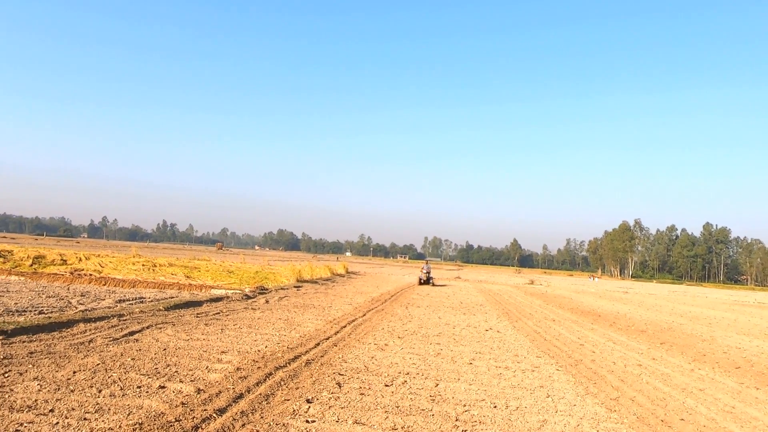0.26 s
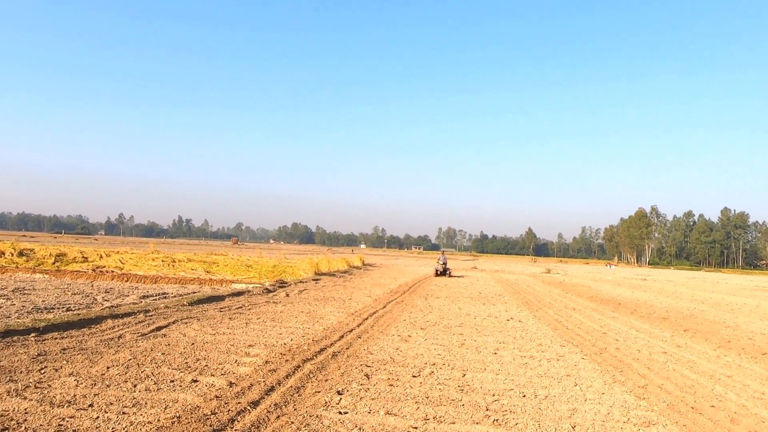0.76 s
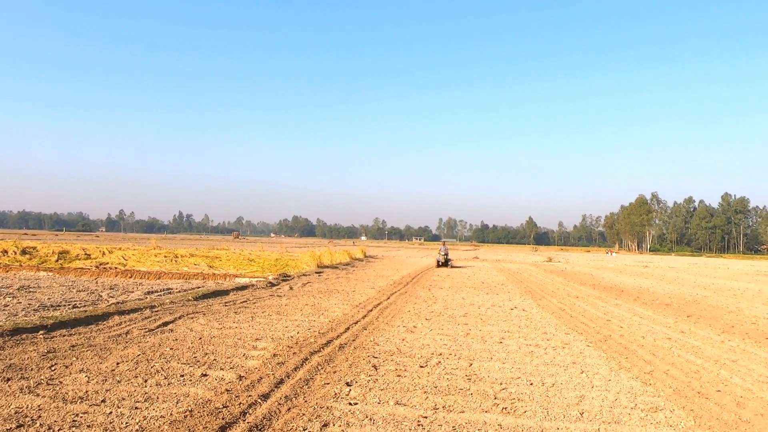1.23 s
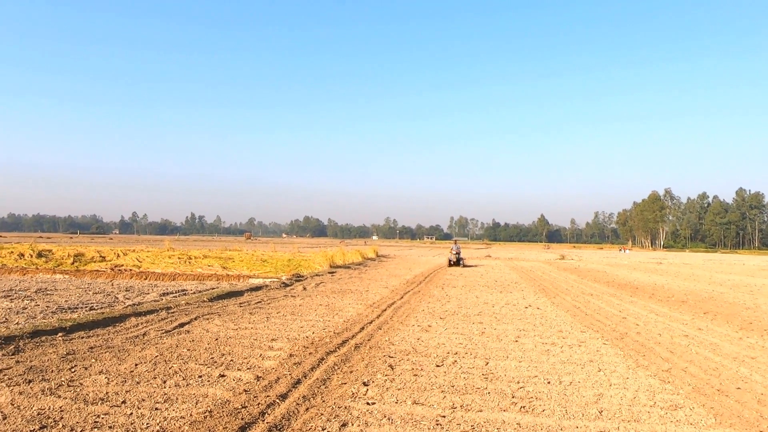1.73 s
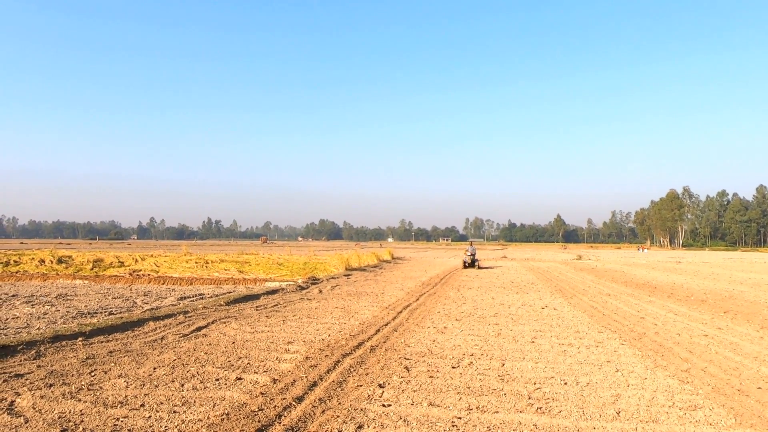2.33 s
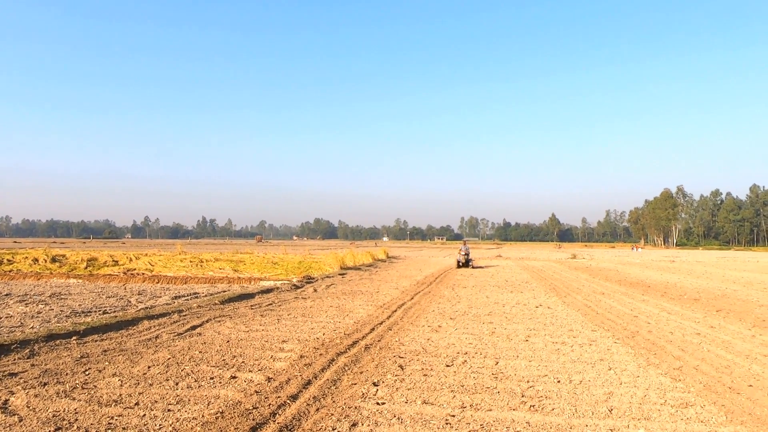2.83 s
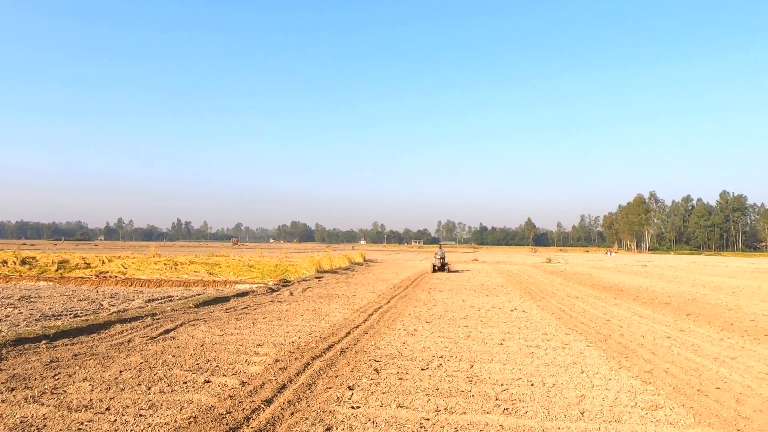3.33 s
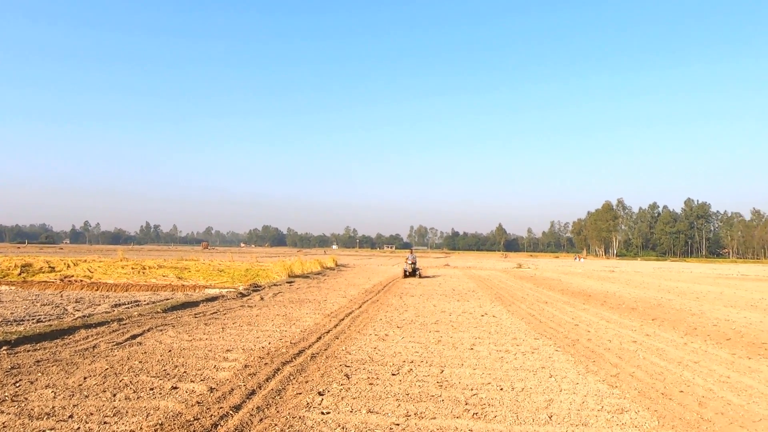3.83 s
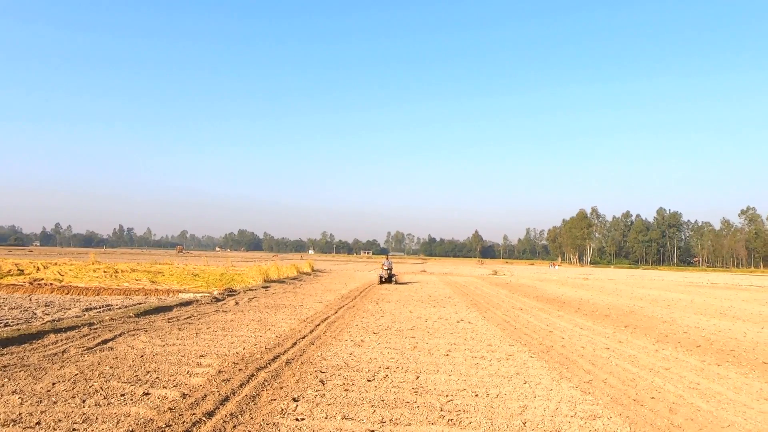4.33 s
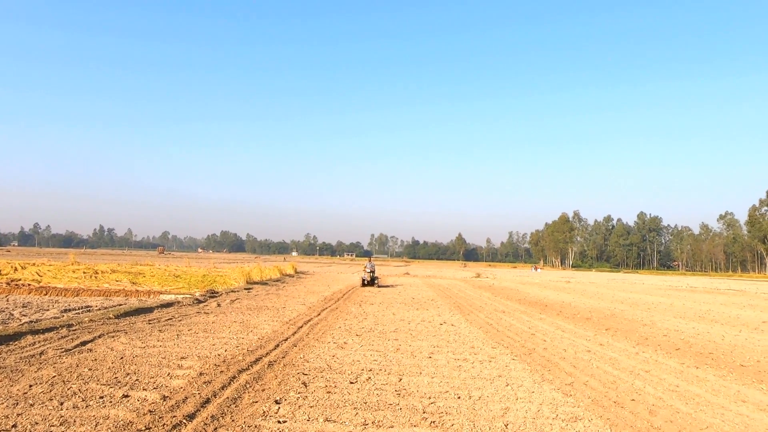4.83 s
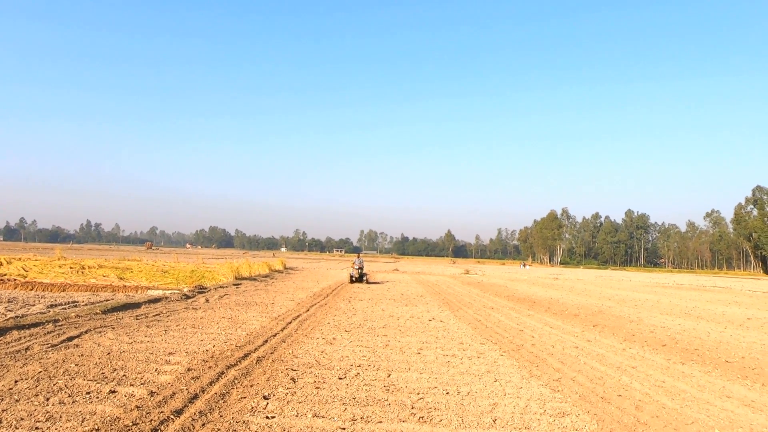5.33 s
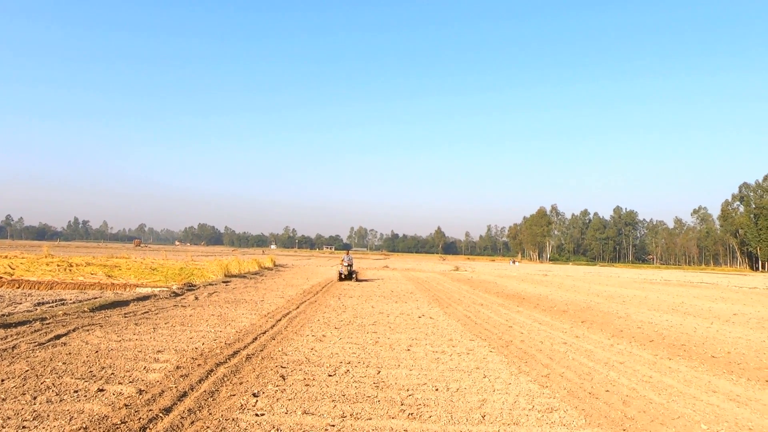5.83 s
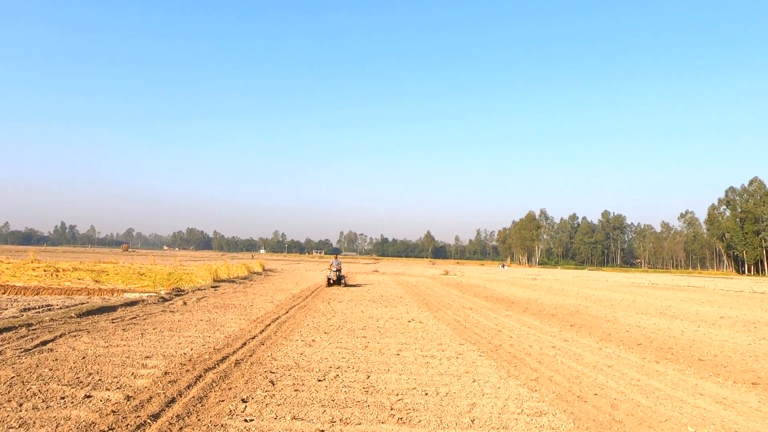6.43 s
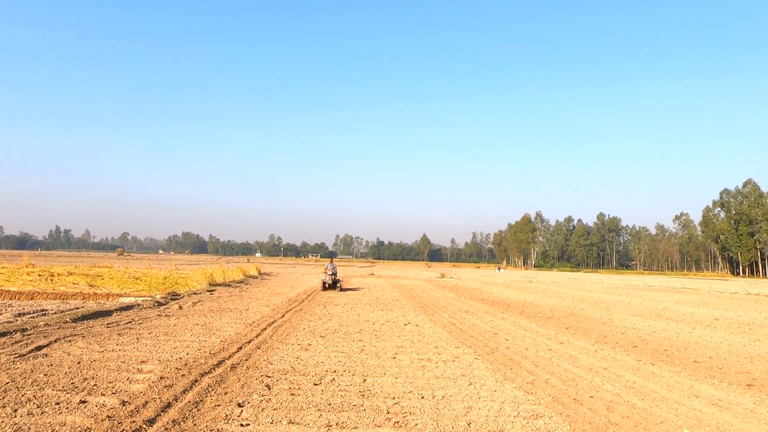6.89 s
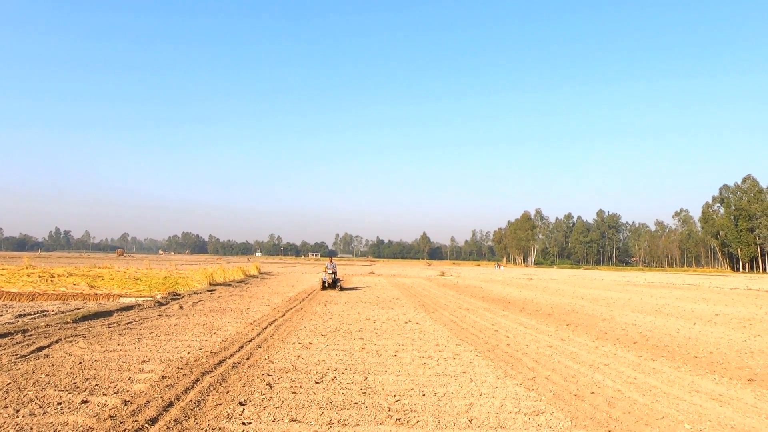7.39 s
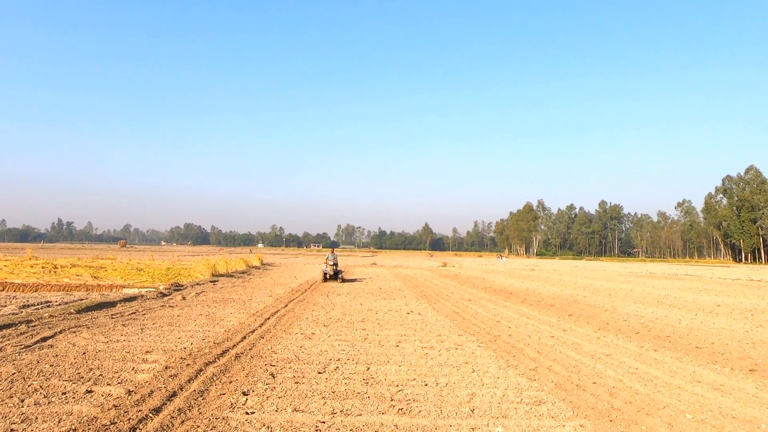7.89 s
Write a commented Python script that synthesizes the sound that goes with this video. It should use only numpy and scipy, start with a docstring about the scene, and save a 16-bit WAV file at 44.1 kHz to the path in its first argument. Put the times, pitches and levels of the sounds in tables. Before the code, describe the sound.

From 0 to 8 seconds a small single-cylinder diesel tiller runs continuously on an open, bare field, starting about thirty metres off and creeping nearer. It fires roughly fifteen times a second at nearly constant speed: a short, hard metallic knock around 2 to 2.6 kHz, then a low exhaust thud and puff near 90 Hz. Steady low rumble and thin bright rattling of tappets, chain and tines fill the gaps. Knocks briefly soften, notably near 0.8, 1.0, 1.5, 2.4 and 4.8 seconds, and are strongest around 3.5-5.2 and 6.9. Crankcase clonks thicken from 3 seconds, fullest after 6.8; dull soil crunching remains faint. Slight rubbing chirps slide upward at 4.1 and downward near 7.6. From 3.5 to 5 the stereo microphone turns aside, changing the right side's tone. Soft low wind buffets, stronger left, come near 6 and 6.5.

```python
"""Single-cylinder diesel tiller driving slowly closer over a bare field: each firing rings the head
in a sharp knock, then the exhaust valve rings the silencer and a low puff follows.
Filtered noise adds a steady low engine rumble and the soil churning; shaped impact grains make
crankcase, gear and tine clatter. Ground bounce, holder echo and port filters colour the tiller.
Behind it: gusty breeze as separate noise at two microphone ports."""
import sys
import numpy as np
from scipy import signal
from scipy.fft import rfft, irfft
from scipy.io import wavfile

SR = 44100
rng = np.random.default_rng(int(sys.argv[2]) if len(sys.argv) > 2 else 0)


def bounce(signal):
    """Save signal as a 16-bit WAV file at the path given by the first command-line argument."""
    frames = np.transpose(np.atleast_2d(signal))
    limited = np.clip(frames, -1, 1)
    pcm = np.round(limited * 32767).astype(np.int16)
    wavfile.write(sys.argv[1], SR, pcm)


N = 359415

# Source levels are dB ahead of the filters and paths that follow.
# engine speed: (time [s], firing rate [1/s])
SPEED_HZ = [(0.0, 14.573), (0.6, 14.548), (1.1, 14.529), (1.7, 14.568), (2.2, 14.595), (2.8, 14.597),
            (3.3, 14.56), (3.9, 14.557), (4.5, 14.511), (5.1, 14.525), (5.9, 14.536), (6.6, 14.55),
            (7.3, 14.56), (8.15, 14.602)]
FIRST_FIRING_S = .0197
# straight approach at walking pace
START_M, PACE_M_PER_S = 33.2, 1.29

# cylinder head and cover, rung by the knock: (frequency [Hz], level [dB], t60 [s])
HEAD_MODES = [(1767, -18, 0.19), (2045, -9, 0.019), (2376, -4, 0.015), (2566, -6.5, 0.022),
              (2630, -20, 0.042), (2960, -30, 0.031)]
# engine pull, heard in the knock: (time [s], level [dB])
LOAD_DB = [(0, -3), (0.6, -1.5), (1.15, 1), (2.1, -0.5), (2.9, -1), (3.6, 2), (4.5, 2.5), (5.2, 3),
           (5.7, -1.5), (6.35, -0.5), (6.9, 3), (8.15, -4)]
# governor cuts the fuel, knock goes soft: (middle [s], length [s], level change [dB])
SOFT_SPELLS = [(0.02, .08, -6), (0.17, .08, -1.5), (0.281, .1, -10), (0.76, 0.17, -13.5), (1.038, .1, -15),
               (1.468, 0.16, -15.5), (1.735, .06, -4), (1.93, 0.15, -4), (2.15, .07, -7.5),
               (2.384, .12, -15), (2.583, .11, -8), (2.813, 0.14, -4.5), (3.215, .12, -4.5),
               (3.502, .1, -11), (3.648, .06, -3.5), (3.862, .07, -12), (3.97, .14, -11), (4.207, 0.14, -9),
               (4.594, 0.094, -3.5), (4.795, .15, -19), (5.1, .07, -8), (5.31, .07, -7), (5.38, .06, -0.5),
               (5.45, .08, -8), (5.605, 0.088, -2), (5.823, 0.19, -6.5), (6.01, 0.057, -5),
               (6.372, 0.2, -3), (6.545, .07, -1), (6.875, .1, -12), (7.15, .11, -1), (7.28, .1, -10),
               (7.533, .18, -7.5), (7.715, .06, 0), (7.85, .07, -12)]
# governor overshoots, one firing knocks harder: (time [s], level change [dB])
HARD_KNOCKS = [(0.913, 2), (1.67, 1), (2.08, 2), (2.7, 1.5), (2.903, 3), (6.067, 2.5), (7.785, 2),
               (7.923, 3.5)]
OVERSHOOT_S = .07
KNOCK_DB = -33.5   # at the starting distance
KNOCK_COLOUR_DB = .8   # spread of each head mode from firing to firing

# silencer and frame, rung as the exhaust valve opens:
# (frequency [Hz], level [dB], t60 [s], first swing [+1 out, -1 in])
EXHAUST_MODES = [(32.1, -9, 0.76, -1), (50.2, -1.5, 0.98, -1), (77.2, -8, 0.96, 1), (87, 11.5, 0.085, 1),
                 (112.8, -0.3, 0.8, -1), (134.9, 3, 0.17, -1), (201.7, -21.5, .25, 1),
                 (244.7, -26.5, 0.39, -1)]
EXHAUST_OPENS, CYLINDER_EMPTIES = 0.2316, 0.441   # shares of the cycle after the knock
# silencer response to the gas rush: (frequency [Hz], gain [dB])
SILENCER = [(15, -21.5), (30, -27.5), (55, -2.5), (100, -16.5), (145, -6.5), (190, -12.5), (245, -24.5),
            (285, -43), (600, -83)]
# panels humming with the engine: (multiple of firing rate [1], depth under unit throb [dB])
HUM = [(13, 30.5), (16, 30.5), (17, 30.5)]
# exhaust throb: (time [s], level [dB])
THROB_DB = [(0, -51), (0.25, -47.5), (0.45, -54), (0.7, -51.5), (1.1, -52), (1.72, -48.5), (2.15, -51),
            (2.45, -48), (2.72, -50), (2.86, -46), (3.05, -49.5), (3.25, -48.5), (3.7, -48.5), (4.2, -49.5),
            (4.8, -47.5), (5.17, -44), (5.4, -47), (6.25, -47), (6.5, -44), (6.85, -45), (7.1, -44),
            (7.38, -47.5), (7.65, -46), (7.95, -48), (8.15, -45)]
TURBULENCE_DB, STROKE_SPREAD_DB = -21, .6   # gas rush under the throb; spread of stroke strength
# low engine rumble with faint hiss: (frequency [Hz], gain [dB])
RUMBLE = [(12, -12.5), (30, -2), (62, 15.5), (100, 6), (150, -5), (190, -15), (300, -26), (600, -24.5),
          (3000, -40), (10000, -36)]

# valve and injector contacts: (share of cycle after the knock [1], level [dB], decay [cycles])
CONTACTS = [(.0, 16, 0.13), (0.226, 18, 0.069), (0.52, 15.5, 0.11), (0.715, 14, 0.062)]
CONTACT_RISE_CYCLES = 0.018
# crankcase resonances: (frequency [Hz], width [Hz], gain relative to broad response [dB])
CASE_MODES = [(838.6, 36, 6.5), (917, 26, 0.5), (1076, 38, -1), (1510, 11, 3), (1755, 12.2, 9),
              (1830, 12, -2)]
# crankcase broad response: (frequency [Hz], gain [dB])
CASING = [(120, -48), (300, -15.5), (700, -21.5), (880, -12.5), (1200, -4), (1500, -1), (2000, 0.5),
          (2600, -22), (3200, -11.5), (5000, -37)]
# crankcase drive: (time [s], low ring level [dB], high ring level [dB])
CRANKCASE_DB = [(0, -62, -63.5), (0.6, -65, -60.5), (1.5, -64.5, -65), (1.9, -64.5, -58.5), (2.2, -61, -58),
                (2.95, -59.5, -61), (3.25, -58.5, -55), (4.6, -56, -53.5), (5.4, -55.5, -53.5),
                (6.4, -54, -53.5), (6.9, -50, -51.5), (8.15, -48, -51)]
# tines jolt the machine, crankcase clonks: (middle [s], level change of low ring [dB])
JOLTS = [(0.08, 6.5), (1.1, 1.5), (2.07, 4), (2.28, 4), (3.13, 5.5), (3.22, 1), (3.37, 3.5), (3.61, 3.5),
         (4.29, 5), (4.44, 3), (4.58, 4.5), (4.72, 3), (4.98, 0), (5.16, 3.5), (5.39, 4.5), (5.53, 3.5),
         (5.94, 4.5), (6.3, 3), (6.42, 4), (6.72, 1.5), (6.84, 4.5), (6.98, 2), (7.25, 2.5), (7.41, 4),
         (8.06, 0.5)]
JOLT_S = 0.11

# rubbing ring sliding in pitch: (middle [s], length [s], start [Hz], end [Hz], level [dB])
SLIDES = [(4.139, 0.29, 1350, 1564, -67), (7.586, 0.11, 1666, 1450, -52), (7.756, 0.126, 1660, 1418, -59)]

# edges of the bands in which loose parts rattle: (frequency [Hz])
RATTLE_EDGES_HZ = [1400, 2300, 3100, 3900, 4700, 5600, 6700, 8200, 11000]
# chain guard resonances: (frequency [Hz], width [Hz], gain relative to broad response [dB])
GUARD_MODES = [(3766, 95, -3), (3970, 110, -8), (4275, 78, -2.5), (4710, 80, -3.5), (5160, 95, -2),
               (6640, 55, -14)]
# response of tappets, chain and tines: (frequency [Hz], gain [dB])
GEARS = [(700, -30), (1400, -9), (1900, 1.5), (2600, -1), (3100, -7), (3800, 0.05), (4500, -0.5),
         (5150, -5.5), (5900, -15.5), (6800, -9), (7300, -4), (8000, -21), (9300, -14), (10400, -33)]
# clatter of tappets, chain and tines: (time [s], level [dB])
CLATTER_DB = [(0, -50.5), (0.25, -50.5), (0.43, -54.5), (0.8, -48.5), (1.47, -51.5), (2.1, -49.5),
              (3.6, -49), (4.1, -51), (4.6, -48.5), (5.15, -50.5), (6.3, -50), (6.8, -48.5), (7.6, -47.5),
              (8.15, -49.5)]
# brief changes in the rattle, mostly louder clinks: (middle [s], level change [dB])
CLINKS = [(0.1, 3), (0.245, 0), (1.12, 2.5), (2.44, 6.5), (3.12, 2.5), (4.73, 2.5), (5.1, -2), (5.53, 3.5),
          (7.33, 4.5)]
CLINK_S = 0.029
JINGLE_DB = 0.5   # over the clatter level
BRIGHTEN_DB_PER_M = 0.3055   # finest jingle carries least far
GEAR_GRAINS_PER_S, GEAR_GRAIN_DB = 5000, 3   # impact rate, spread of size
# spread of crankcase contacts, of gear contacts, and of each rattle band
CASE_UNEVEN_DB, GEAR_UNEVEN_DB, GEAR_FLICKER_DB = 3, 2.2, 1.9

# soil response: (frequency [Hz], gain [dB])
SOIL = [(120, -9), (240, 3.5), (330, -2.5), (560, -0.5), (720, -10), (1100, -17.5), (3000, -46)]
# tines bite harder clods: (middle [s], length [s], level change of churning [dB])
BITES = [(0.05, 1, 7.5), (1.693, 0.25, 13.5), (2.702, 0.072, 4), (3.162, 0.4, 9.5), (3.597, 0.12, 6),
         (3.945, 0.084, 7), (4.938, 0.28, 8), (5.528, 0.54, 6), (6.797, 0.4, 6.5), (7.936, 0.11, 8.5)]
CHURN_DB = -84.5   # at the starting distance
SOIL_LOSS_DB_PER_M = 0.9858   # soft ground swallows the lower middle range

# lag of the ground bounce, shrinking slightly: (time [s], lag [s])
GROUND_LAG_S = [(0, 0.00019), (8.15, 0.00018)]
# echo off whoever holds the microphone: (time [s], left lag [ms], right lag [ms])
HOLDER_LAG_MS = [(0, 2, 3.1), (2.2, 2.77, 2.3), (4.1, 2.18, 2.13), (8.15, 2.14, 1.95)]
# microphone swings away from the tiller: (time [s], turn [0 facing to 1 aside])
TURN = [(0, 0), (2.6, 0.036), (3.5, 0.27), (4.7, 0.51), (4.9, 0.79), (8.15, 0.69)]
# left port response: (frequency [Hz], gain [dB])
LEFT_PORT = [(650, -1), (1050, -9), (1500, -5.5), (1750, -2.5), (2500, 11), (2900, 6.5), (3150, -0.5),
             (3500, -8.5), (3750, -8.5), (5100, -2), (6200, 6.5), (7000, -7.5), (7800, -7), (10300, 7)]
# right port response, facing the tiller: (frequency [Hz], gain [dB])
RIGHT_PORT_FACING = [(650, -0.5), (900, 4.5), (1500, 0.5), (1750, -5.5), (2000, 0.5), (2250, -7.5),
                     (2480, -9), (2720, 5.5), (3100, 2.5), (4000, 1), (5100, -1), (5650, 5), (6050, -16),
                     (6400, 6), (7200, 3), (8000, -21), (10000, 9.5)]
# right port response, turned aside: (frequency [Hz], gain [dB])
RIGHT_PORT_TURNED = [(650, -0.5), (900, -5), (1500, -0.5), (1750, -12.5), (2000, 1.5), (2250, -19),
                     (2480, -10.5), (2720, 17), (3100, 6), (4000, 2.5), (5100, -2), (5650, -20.5),
                     (6050, 0), (6400, 12), (7200, -0.5), (8000, -15), (10000, 6)]

# wind spectrum at the ports: (frequency [Hz], gain [dB])
WIND = [(10, 3.5), (30, 1), (70, 5.5), (120, -4), (200, -17.5), (350, -28), (1500, -87)]
# gusts, ahead of the port offsets: (middle [s], length [s], peak added to the calm [dB])
GUSTS = [(0.22, 0.16, -70), (2.106, 0.27, -65), (2.656, 0.4, -73), (4.89, 0.17, -62), (5.415, 0.29, -57),
         (6.032, 0.23, -46), (6.482, 0.3, -45.5), (7.12, 0.31, -54.5), (7.876, 0.18, -59)]
CALM_DB = -81   # breeze between gusts, ahead of the port offsets
CUTOFF_HZ = 10750


def from_db(db):
    """Decibels to amplitude gain."""
    return np.exp(np.asarray(db) * (np.log(10) / 20))


def rms_one(x):
    """Scale to unit rms."""
    return x / np.sqrt(np.mean(x ** 2) + 1e-20)


def in_time(rows):
    """Interpolate each column of a time curve to every sample."""
    s, *columns = np.transpose(rows)
    return [np.interp(np.arange(N) / SR, s, c) for c in columns]


def swell(middle_s, length_s, order):
    """Hump of height 1, length_s wide at 1/e: bell at order 2, flatter on top at higher orders."""
    offset = np.abs(2 * (np.arange(N) / SR - middle_s) / length_s)
    return np.exp(-np.minimum(offset, 10) ** order)


def drift(rate_hz):
    """Slow random curve of unit rms: noise knots at rate_hz, joined by lines."""
    steps = np.arange(N) / SR * rate_hz
    return rms_one(np.interp(steps, np.arange(4096), rng.standard_normal(4096)))


def colour(x, spectrum):
    """Causal minimum-phase filter, via the folded cepstrum of the given response."""
    hz, db = np.transpose(spectrum)
    bin_hz = np.arange(N // 2 + 1) * SR / N
    log_gain = np.log(from_db(np.interp(np.log(bin_hz + 1), np.log(hz), db)))
    cepstrum = irfft(log_gain, N)
    cepstrum[1:] *= 2 * (np.arange(1, N) < N / 2)
    return irfft(rfft(x) * np.exp(rfft(cepstrum)), N)


def band(x, low_hz, high_hz):
    """Butterworth band-pass."""
    return signal.sosfilt(signal.butter(2, [low_hz, high_hz], "band", fs=SR, output="sos"), x)


def ring(clicks, hz, t60_s):
    """Damped two-pole mode; a unit click rings it to about height 1."""
    r = from_db(-60 / (t60_s * SR))
    w = 2 * np.pi * hz / SR
    return signal.lfilter([0, np.sin(w)], [1, -2 * r * np.cos(w), r * r], clicks + 1e-18)


def resonance(x, hz, width_hz):
    """Two-pole band-pass with peak gain of about 1."""
    r = np.exp(-np.pi * width_hz / SR)
    poles = [1, -2 * r * np.cos(2 * np.pi * hz / SR), r * r]
    return signal.lfilter(np.array([1, 0, -1]) * (1 - r * r) / 2, poles, x)


def once_a_cycle(cycle, share, spread_db):
    """Click of random strength each time the engine passes this share of its cycle."""
    at = np.flatnonzero(np.diff(np.floor(cycle - share)))
    clicks = np.zeros(N)
    clicks[at] = from_db(spread_db * rng.standard_normal(256)[:len(at)])
    return clicks


def grains(per_s, spread_db):
    """Dense tiny metal impacts of random sign and uneven size."""
    born = rng.random(N) < per_s / SR
    sign = rng.choice([-1, 1], N)
    size = from_db(spread_db * np.minimum(rng.exponential(1, N), 4))
    return rms_one(born * sign * size)


def with_scatter(direct, scatter_db):
    """Direct sound in both ports, plus separate noise in each as scatter."""
    return rms_one(direct + from_db(scatter_db) * rng.standard_normal((2, N)))


def knock(cycle, hardness_db, low_hz, high_hz, tail_db, tail_s):
    """Pressure jump at ignition rings the head modes; the soil scatters a short noise tail."""
    blows = 0
    for hz, db, t60_s in HEAD_MODES:
        clicks = once_a_cycle(cycle, 0, spread_db=KNOCK_COLOUR_DB)
        blows = blows + ring(clicks * from_db(hardness_db + db), hz, t60_s)
    # two passes: pressure builds over a few swings
    blows = band(band(blows, low_hz, high_hz), low_hz, high_hz)
    # tail envelope follows the power of the blows
    age_s = np.arange(SR // 10) / SR
    decay = age_s * np.exp(-age_s / tail_s)
    tail = np.sqrt(np.abs(signal.fftconvolve(blows ** 2, decay / decay.sum())[:N]))
    noise = with_scatter(rng.standard_normal(N), scatter_db=5.5)
    return blows + from_db(tail_db) * tail * rms_one(band(noise, low_hz, high_hz))


def throb(cycle, stroke_spread_db, puff_s, puff_db, turbulence_db, gust_cycles):
    """Opening valve rings the silencer, the emptying cylinder puffs; gas rushes, panels hum."""
    blows = once_a_cycle(cycle, EXHAUST_OPENS, spread_db=stroke_spread_db)
    boom = sum(way * from_db(db) * ring(blows, hz, t60_s) for hz, db, t60_s, way in EXHAUST_MODES)
    # far from the pipe, pressure is the rate of change of a bell-shaped flow
    from_puff_s = ((cycle - CYLINDER_EMPTIES + .5) % 1 - .5) / in_time(SPEED_HZ)[0]
    z = from_puff_s / puff_s
    puffs = -from_db(puff_db) * z * np.exp(-z * z / 2)
    since_opening = (cycle - EXHAUST_OPENS) % 1
    rush = rng.standard_normal(N) * np.exp(-since_opening / gust_cycles)
    rush = rms_one(colour(band(rush, 25, 180), SILENCER))
    hum = sum(from_db(-db) * np.sqrt(2) * np.sin(2 * np.pi * np.round(k) * since_opening) for k, db in HUM)
    return rms_one(boom + puffs) + hum + from_db(turbulence_db) * rush


def engine_rumble():
    """Steady dull noise peaking near 60 Hz, almost the same in both ports, with faint hiss."""
    noise = with_scatter(rng.standard_normal(N), scatter_db=-32.0)
    return from_db(-61.0) * rms_one(colour(noise, RUMBLE))


def shaking(cycle, steady_db, uneven_db):
    """Rattle envelope: steady, plus a burst of power after each valve-gear contact."""
    power = from_db(steady_db) ** 2
    for share, db, decay_cycles in CONTACTS:
        age = (cycle - share) % 1
        burst = np.exp(-age / decay_cycles) * (1 - np.exp(-age / CONTACT_RISE_CYCLES))
        power = power + from_db(db + uneven_db * drift(15)) ** 2 * burst
    return rms_one(np.sqrt(power))


def casing(cycle, low_db, high_db, clonk_db, clonk_cycles):
    """Impacts through crankcase resonances: lows clonk after firing, highs follow the valve gear."""
    hits = with_scatter(grains(per_s=1900, spread_db=1.14), scatter_db=-5.0)
    body = hits + sum(from_db(db) * resonance(hits, hz, width_hz) for hz, width_hz, db in CASE_MODES)
    body = rms_one(colour(body, CASING))
    clonk = rms_one(from_db(clonk_db * np.exp(-((cycle - .05) % 1) / clonk_cycles)))
    shake = shaking(cycle, steady_db=13, uneven_db=CASE_UNEVEN_DB)
    low_ring = from_db(low_db) * band(body * clonk, 610, 1086)
    high_ring = from_db(high_db) * band(body * shake, 1330, 4180)
    return low_ring + high_ring


def sliding_ring(flutter_hz):
    """Rubbing part: a gliding tone roughened by random quadrature amplitudes."""
    out = 0
    for s, length_s, start_hz, end_hz, db in SLIDES:
        hz, = in_time([(s - length_s / 2, start_hz), (s + length_s / 2, end_hz)])
        phase = 2 * np.pi * np.cumsum(hz) / SR
        rough = rms_one(drift(flutter_hz) * np.sin(phase) + drift(flutter_hz) * np.cos(phase))
        out = out + from_db(db) * swell(s, length_s, order=4) * rough
    return out


def gears(cycle, rattle_db, jingle_db):
    """Tappets, chain and tines: impact grains in bands, each with its own flicker."""
    hits = [with_scatter(grains(GEAR_GRAINS_PER_S, GEAR_GRAIN_DB), scatter_db=-13.5) for _ in range(2)]
    shakes = [shaking(cycle, steady_db=9.5, uneven_db=GEAR_UNEVEN_DB) for _ in range(2)]
    parts = 0
    for k, (low_hz, high_hz) in enumerate(zip(RATTLE_EDGES_HZ, RATTLE_EDGES_HZ[1:])):
        if low_hz >= RATTLE_EDGES_HZ[5]:
            level_db = jingle_db + 1.4 * drift(60)
        else:
            level_db = rattle_db + GEAR_FLICKER_DB * drift(80)
        # neighbouring bands take alternate hits
        parts = parts + band(hits[k % 2], low_hz, high_hz) * shakes[k % 2] * from_db(level_db)
    guard = sum(from_db(db) * resonance(parts, hz, width_hz) for hz, width_hz, db in GUARD_MODES)
    return colour(parts + guard, GEARS)


def churning(lumpy_db):
    """Tines turning dry soil: dull noise of drifting level."""
    soil = with_scatter(rng.standard_normal(N), scatter_db=-8.0)
    return rms_one(colour(soil * from_db(lumpy_db * drift(25)), SOIL))


def over_ground(x, bounce_db):
    """Weaker copy off the soil, just later, combs the treble."""
    late = np.arange(N) - in_time(GROUND_LAG_S)[0] * SR
    return x + from_db(bounce_db) * np.array([np.interp(late, np.arange(N), side) for side in x])


def off_holder(x, echo_db, above_hz):
    """Treble echo off the holder's body; its ripple slides as the hand moves."""
    treble = band(x, above_hz, 14000)
    now = np.arange(N)
    lags_ms = in_time(HOLDER_LAG_MS)
    echoes = [np.interp(now - lag_ms * SR / 1000, now, side) for lag_ms, side in zip(lags_ms, treble)]
    return x + from_db(echo_db) * np.array(echoes)


def through_ports(x):
    """Filter each port; the right one crossfades between responses as the microphone turns."""
    turned = np.clip(in_time(TURN)[0], 0, 1)
    facing = (1 - turned) * colour(x[1], RIGHT_PORT_FACING)
    aside = turned * colour(x[1], RIGHT_PORT_TURNED)
    return np.array([colour(x[0], LEFT_PORT), facing + aside])


def diffuse_jingle(clatter_db):
    """Jingle scattered from all sides: separate treble noise per port, following the clatter level."""
    return from_db(clatter_db - 23.5) * rms_one(band(rng.standard_normal((2, N)), 4300, 8980))


def breeze(lumpy_db):
    """Eddies hit each port separately: low noise of drifting level."""
    lumps = from_db(lumpy_db * np.array([drift(8.1), drift(10.0)]))
    return rms_one(colour(rng.standard_normal((2, N)) * lumps, WIND))


def scene():
    """Tiller through both ports, with diffuse jingle, breeze and low engine rumble."""
    cycle = np.cumsum(in_time(SPEED_HZ)[0]) / SR
    cycle = cycle - cycle[int(FIRST_FIRING_S * SR)]
    driven_m = PACE_M_PER_S * np.arange(N) / SR
    nearer_db = 20 * np.log10(START_M / np.maximum(START_M - driven_m, 1))
    over_soil_db = nearer_db + SOIL_LOSS_DB_PER_M * driven_m

    fuel_db = in_time(LOAD_DB)[0]
    fuel_db = fuel_db + sum(db * swell(s, length_s, order=4) for s, length_s, db in SOFT_SPELLS)
    fuel_db = fuel_db + sum(db * swell(s, OVERSHOOT_S, order=4) for s, db in HARD_KNOCKS)
    jolt_db = sum(db * swell(s, JOLT_S, order=2) for s, db in JOLTS)
    clink_db = sum(db * swell(s, CLINK_S, order=2) for s, db in CLINKS)
    bite_db = sum(db * swell(s, length_s, order=2) for s, length_s, db in BITES)
    clatter_db, = in_time(CLATTER_DB)
    low_db, high_db = in_time(CRANKCASE_DB)

    tiller = knock(cycle, KNOCK_DB + nearer_db + fuel_db, low_hz=1760, high_hz=2635,
                   tail_db=-8.0, tail_s=0.0017)
    exhaust = throb(cycle, STROKE_SPREAD_DB, puff_s=0.0023, puff_db=0.0,
                    turbulence_db=TURBULENCE_DB, gust_cycles=0.36)
    tiller += from_db(in_time(THROB_DB)[0]) * exhaust
    tiller += casing(cycle, low_db + jolt_db, high_db, clonk_db=6, clonk_cycles=0.36)
    tiller += sliding_ring(flutter_hz=140)
    jingle_db = JINGLE_DB + clatter_db + BRIGHTEN_DB_PER_M * driven_m
    tiller += over_ground(gears(cycle, clatter_db + clink_db, jingle_db), bounce_db=-11.5)
    tiller += from_db(CHURN_DB + over_soil_db + bite_db) * churning(lumpy_db=4.0)
    ports = through_ports(off_holder(tiller, echo_db=-16.0, above_hz=1960))

    gusts = sum(from_db(db) * swell(s, length_s, order=2) for s, length_s, db in GUSTS)
    wind = (from_db(CALM_DB) + gusts) * breeze(lumpy_db=5.0)
    wind = wind * from_db([[4.5], [-5.5]])   # left port faces the wind
    return ports + diffuse_jingle(clatter_db) + wind + engine_rumble()


def record(dry):
    """Steep elliptic low-pass cuts the top."""
    return signal.sosfilt(signal.ellip(12, .1, 80, CUTOFF_HZ, fs=SR, output="sos"), dry)


dry = scene()
out = record(dry)
bounce(out)
```